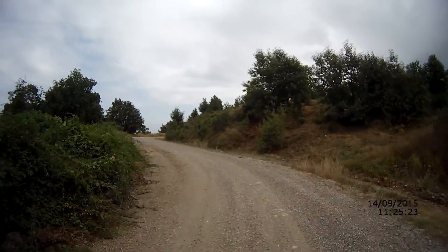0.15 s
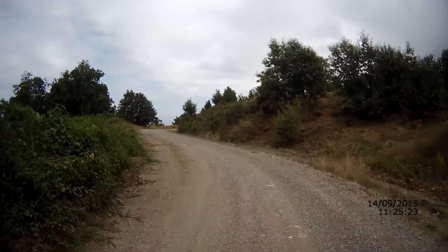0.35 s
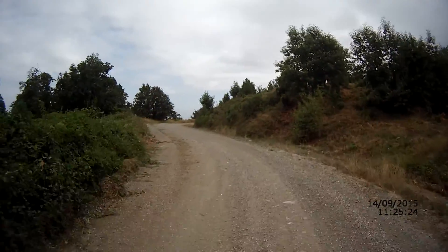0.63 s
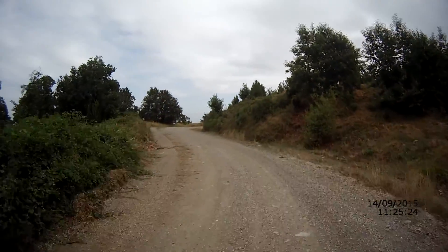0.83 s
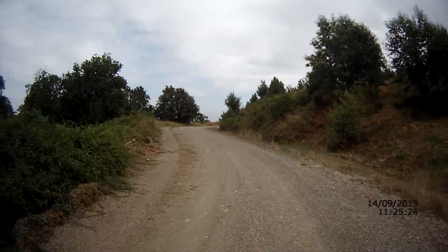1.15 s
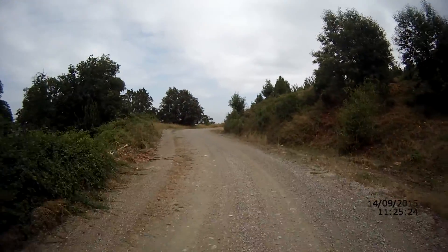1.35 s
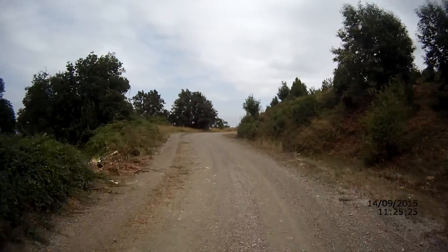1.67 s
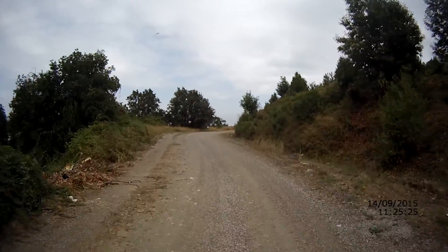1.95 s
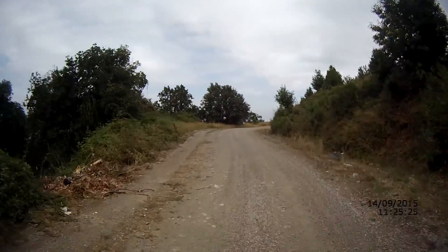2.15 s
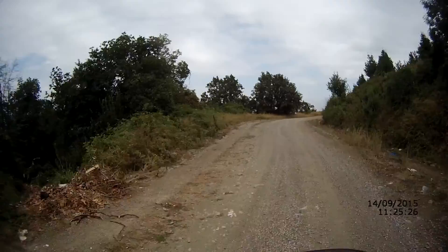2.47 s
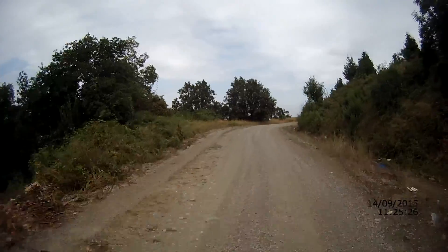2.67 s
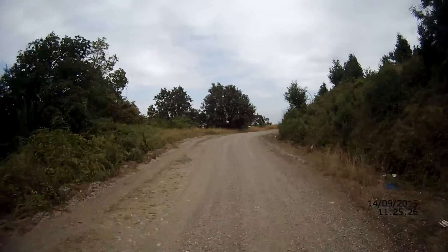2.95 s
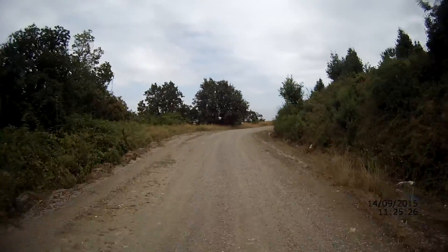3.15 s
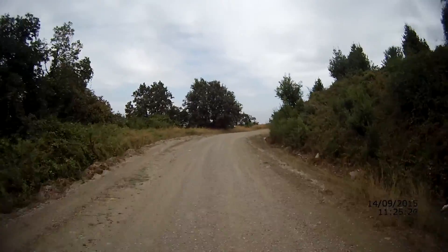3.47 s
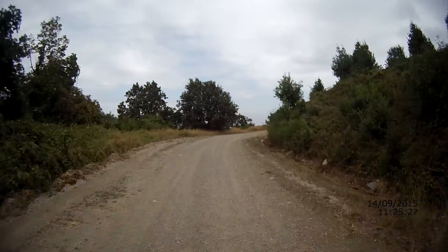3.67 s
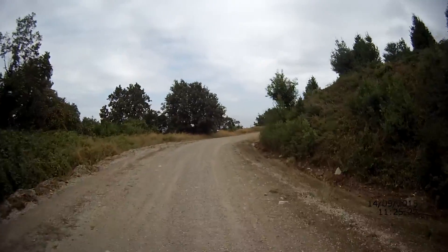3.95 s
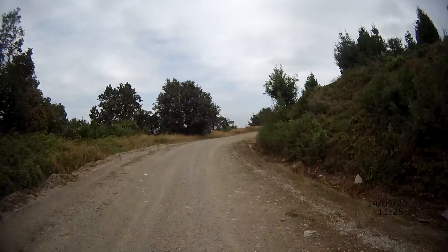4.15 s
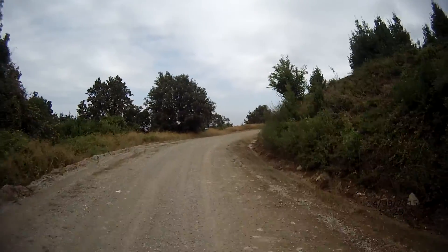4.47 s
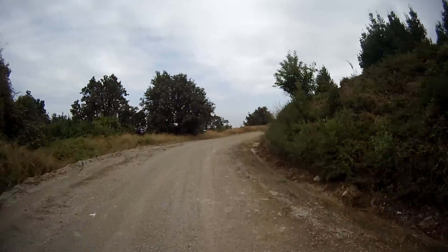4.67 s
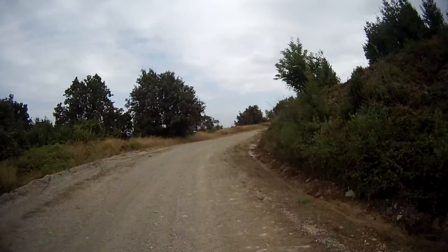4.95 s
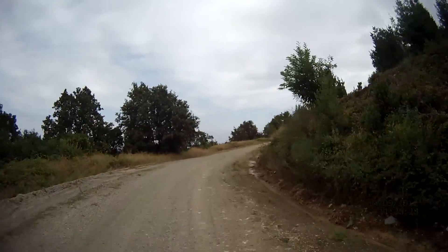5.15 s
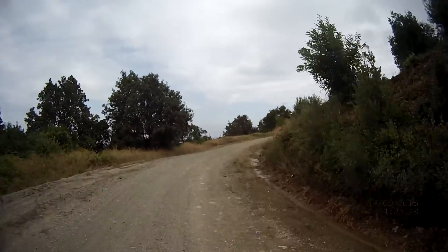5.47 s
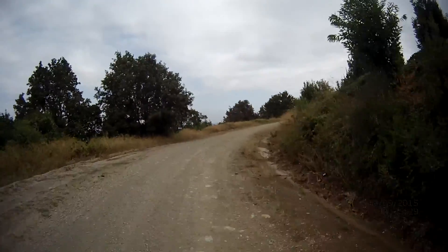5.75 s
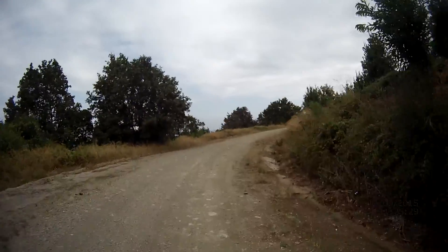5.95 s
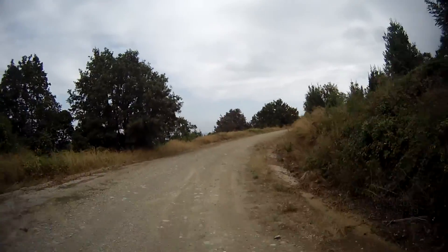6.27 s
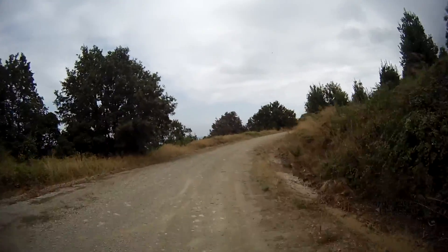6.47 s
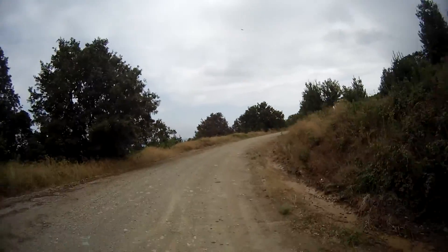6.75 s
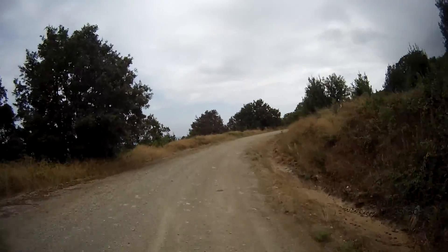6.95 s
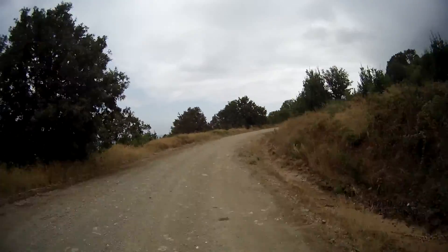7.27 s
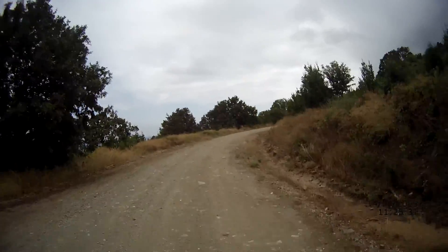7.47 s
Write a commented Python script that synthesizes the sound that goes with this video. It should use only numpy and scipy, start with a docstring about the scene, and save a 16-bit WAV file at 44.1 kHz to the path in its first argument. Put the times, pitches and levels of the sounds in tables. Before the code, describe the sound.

Close, boxy onboard sound of a motorcycle gently accelerating outdoors on rough gravel. Pulsing mechanical clatter smooths into a steady rattling buzz while air hiss and crunchy tyre noise grow. Near the start a small stone skitters sharply against metal, then knocks dully. Afterwards panels sing and a narrow whistle comes and goes over low vibration and soft gusts until the end.

```python
"""A motorcycle's engine clatters and gathers speed gently on a gravel road, heard in a plastic camera case.
Engine clatter, rushing air and tyre grit are noise passed through narrow resonances or a broad spectrum.
Panels sing and one resonance whistles; the low shake is a pair of sines locked to the crank.
The mount booms on the rough road and wind rumbles faintly, both as filtered noise.
Early on, one thrown stone chinks against metal as noise bursts and decaying sines; dull knocks follow."""
import sys
import numpy as np
from scipy import signal
from scipy.fft import rfft, irfft, next_fast_len
from scipy.io import wavfile
from scipy.ndimage import uniform_filter1d, map_coordinates

SR = 44100
rng = np.random.default_rng(int(sys.argv[2]) if len(sys.argv) > 2 else 0)


def unload_audio(sound):
    """Save the sound as a 16-bit wav file, at the path given as the first command line argument."""
    columns = np.transpose(np.atleast_2d(sound))
    # keep every value between -1 and 1, then stretch to whole-number steps
    steps = np.round(np.clip(columns, -1, 1) * 32767)
    wavfile.write(sys.argv[1], SR, steps.astype(np.int16))


N = 335601

# Wind: gusts and lulls (middle [s], reach [s], change in rumble [dB], change in buffeting [dB])
GUSTS = [(.1, .12, -4, -1), (.6, .2, -2, 3), (1.02, 0.075, -10, -10), (1.25, .08, -1, -1),
         (1.56, .08, 0, -15), (1.74, 0.064, -2, 0), (1.9, 0.056, 0, -6), (2.17, .13, 2, -7),
         (3.1, .3, 1, -4), (3.9, .15, -3, 1.5), (4.4, .3, -4, 0), (5.05, .25, -3, -3), (5.6, .3, -5, -2),
         (6.15, 0.12, 4, 4), (6.74, .07, 8, 0), (7.25, .08, 6.5, 6), (7.5, .08, 1, 3)]
# Wind spectra: (frequency [Hz], relative density [dB per Hz])
RUMBLE_COLOUR = [(8, -4), (18, 1), (30, -2), (45, -5), (65, -10), (95, -27), (130, -50), (400, -90)]
BUFFET_COLOUR = [(30, -24), (60, -0.5), (90, -3.5), (110, -2.5), (135, -19), (200, -31), (500, -80)]
RUSH_COLOUR = [(100, -16), (170, -5), (300, 1), (700, -1), (1000, -8), (2000, -16), (3000, -8), (6000, -18),
               (12000, -16)]
# Case resonances blown by the air: (frequency [Hz], approximate width [Hz], relative level [dB])
AIR_MODES = [(1120, 93, -6), (2515, 91, -4), (3764, 200, 1.5), (4070, 165, 2.5), (4200, 150, -1.5),
             (4505, 107, 0), (4680, 150, -1.5), (4930, 120, 0), (5132, 140, 3.5), (5300, 110, -3),
             (5520, 160, -7.5), (6190, 1030, -8.5), (6530, 270, -10), (6820, 200, -9), (8475, 770, -10),
             (9500, 480, -20), (11130, 1000, -25.5)]
# Rough and smooth road: (middle [s], reach [s], change in mount boom [dB], change in frame drone [dB])
STRETCHES = [(.08, 0.17, 5, 2.5), (1.5, 0.19, -6, -1.5), (2.12, 0.1, -29, -1.5), (2.76, 0.064, 5, 1.5),
             (3.38, 0.1, 4, -0.5), (3.6, 0.079, -7, -0.5), (4.25, 0.094, 2, -1.5), (4.6, .06, -2, -1.5),
             (5.1, 0.22, 0.5, 0.5), (5.38, 0.065, 1, 0.5), (5.57, 0.12, 3.5, -0.5), (5.87, .13, 2.5, -0.5),
             (6.17, 0.11, 2, -0.5), (6.5, 0.11, -1.5, -0.5), (6.8, .06, 2, 0), (7, 0.11, -0.5, -2.5),
             (7.26, 0.13, -2, 0), (7.58, 0.067, -7, 1.5)]
# Camera mount resonances: (frequency [Hz], approximate width [Hz], relative level [dB])
MOUNT_MODES = [(151, 26.6, -5.5), (196.8, 13.5, -1), (227, 26, -7), (337, 97, -16.5)]
# Frame resonances rung by the road: (frequency [Hz], approximate width [Hz], relative level [dB])
ROAD_MODES = [(209, 39, 6.5), (290, 59, -6), (360, 42, 0.5), (456, 49, 1.5), (583, 210, -7), (695, 112, -2),
              (893, 126, -9), (1144, 98, -3.5)]
# Broad tyre spectrum: (frequency [Hz], relative density [dB per Hz])
TYRE_COLOUR = [(200, -29), (500, 0.5), (1000, 0.5), (1500, 4.5), (2450, 7.5), (2920, 1), (3400, 2.5),
               (5000, 6), (6000, -13.5), (7500, 0.5), (9300, -12), (10200, -13), (11500, -15.5),
               (13500, -35)]
# Bumps that jolt the bike: (time [s], change in rattle [dB])
JOLTS = [(4.84, -0.5), (5.17, 2), (6.0, 1.5), (7.25, 3)]
JOLT_RISE_S, JOLT_FADE_S = 0.018, 0.072
# Stone contacts: (time [s], crack level [dB], ring level [dB])
STONE = [(1.6832, -44, -48), (1.6848, -28.5, -32.5), (1.6873, -28.5, -35), (1.6914, -33, -31),
         (1.6953, -31, -39), (1.7015, -43, -53), (1.7077, -38, -45), (1.7094, -36, -44), (1.7132, -36, -48),
         (1.718, -44, -52), (1.7225, -44, -52)]
# Modes of the struck metal: (frequency [Hz], relative level [dB], time to decay by 60 dB [s])
STONE_MODES = [(3220, -21, 0.089), (3220, -17, 0.035), (3790, -19, .035), (4000, -15, .03),
               (4520, -20, 0.031), (4650, -14, .025), (4900, -13, 0.045), (5140, 1, 0.022),
               (5150, -5.5, 0.018), (5300, -15, .03), (6400, -16, 0.044), (6850, -19, .03),
               (7770, -17, 0.038), (8450, -12.5, .025), (8880, -16.5, .015), (11580, -26, .025)]
# Spectrum of the crack: (frequency [Hz], relative density [dB per Hz])
CRACK_COLOUR = [(2800, -50), (3200, -6), (3800, -5), (5000, 3), (5700, -12), (6400, -7.5), (8500, -7.5),
                (9800, -21), (11700, -21), (14000, -38)]
# Dull knocks after the stone: (time [s], relative level [dB])
KNOCKS = [(1.7328, -33), (1.7375, -32.5), (1.7472, -33), (1.7535, -41), (1.768, -41)]
# Resonances of the knocks: (frequency [Hz], approximate width [Hz], relative level [dB])
KNOCK_MODES = [(520, 220, -3.5), (756, 170, -6.5), (1300, 520, -7)]
# Mean engine speed: (time [s], crank turns per second [Hz])
CRANK = [(0, 32.8), (.8, 33.9), (1.6, 35.56), (2.3, 38.54), (3, 41.2), (3.6, 42.3), (4, 42.9), (4.5, 45.5),
         (5.1, 46.8), (7.6, 47.2)]
CRUISE_HZ = 47.5  # crank speed at which speed-dependent levels are given
# How hard the engine clatters for its speed: (time [s], level [dB])
EFFORT = [(0, 2), (1.3, -1), (2, -1), (3.1, 1), (4, -0.1), (5.3, 0.5), (6, 0.3), (6.45, -1), (6.7, 0.5),
          (7.6, 0.5)]
# Case resonances rung by the engine: (frequency [Hz], approximate width [Hz], relative level [dB])
ENGINE_MODES = [(1379, 125, -2.5), (1570, 190, -3), (1773, 140, 0.5), (2095, 110, -6.5), (2305, 107, -1.5),
                (2463, 75, 2), (2690, 275, -4.5), (3250, 203, -0.5), (4220, 170, -2.5), (4470, 100, 0),
                (4945, 100, -0.5), (5144, 260, 0)]
# Singing panels: (frequency [Hz], approximate width [Hz], base level at cruise [dB],
# growth with speed [dB per octave], critical crank speed [Hz], reach in crank speed [Hz], gain there [dB])
PANELS = [(1811, 150, -63, 21, 47.6, 1.6, 4), (2365, 160, -68.5, 30, 47.4, 2.2, 2.5)]
# Panels buzz up or settle: (middle [s], reach [s], change in lower panel [dB], change in upper panel [dB])
SURGES = [(3.14, 0.045, 7, 0), (4.94, .04, 6, -1), (5.348, .1, 4.5, 2), (6.02, 0.058, 5, 1),
          (6.5, 0.1, -1.5, 8), (6.88, 0.037, -1, 4), (7.02, .04, -1, -2), (7.336, .05, 4, -5)]
# Whistling case resonance: (time [s], level [dB])
WHISTLE = [(0, -77), (2.5, -71), (2.85, -69), (3.15, -58), (3.4, -58), (3.75, -55), (4, -55), (4.25, -59.5),
           (4.65, -60), (4.85, -54.5), (5.1, -63), (5.9, -58.5), (6.15, -63), (6.9, -59.5), (7.3, -56.5),
           (7.6, -58)]
WHISTLE_HZ, WHISTLE_WIDTH_HZ = 3230, 230
# Division of sound by the case: (frequency [Hz], left minus right [dB])
PORTS = [(60, -9), (150, -1.5), (220, 0), (370, 4.5), (480, 8.5), (680, 10), (1000, 8), (1250, 7.5),
         (2300, 6), (4200, 6), (7700, 5), (13000, 2)]
# Phase advance of the left port: (frequency [Hz], lead [radians])
PORT_LEAD = [(130, 0.66), (200, 0.81), (340, 1), (500, 0.72), (900, 0.15)]
# Converter offsets: (left [full scale], right [full scale])
OFFSET = (.060, -.029)
TOP_HZ = 13500  # upper limit of the camera

TIME = np.arange(N) / SR
SIZE = next_fast_len(N, real=True)
FREQ = np.maximum(np.arange(SIZE // 2 + 1) * SR / SIZE, 1)


def undb(db):
    """Logarithmic level: decibels become an amplitude gain."""
    return 10 ** (np.asarray(db) / 20)


def unit(x):
    """Normalisation: scale to an rms of 1."""
    return x / np.sqrt(np.mean(x ** 2))


def curves(table):
    """Linear interpolation: join each column of a table by straight lines in time."""
    s, *columns = np.transpose(table)
    return [np.interp(TIME, s, column) for column in columns]


def noise():
    """White noise: independent normal samples with a flat expected spectrum."""
    return rng.standard_normal(N)


def walk(rate):
    """Smoothed random steps: a wandering of spread near 1, with about `rate` new values a second."""
    k = int(SR / rate)
    steps = np.repeat(rng.standard_normal(N // k + 1), k)
    return unit(uniform_filter1d(steps, k)[:N])


def shape(x, gain):
    """Linear filtering: multiply the spectrum by a gain at each frequency."""
    return irfft(rfft(x, SIZE) * gain, SIZE)[..., :N]


def waver(x, share, rate=9):
    """Time warping: the flexing case shifts its resonances up and down by a small share."""
    delay = np.cumsum(share * walk(rate))
    return map_coordinates(x, [np.arange(N) + delay], mode="mirror")


def colour(points):
    """Spectral envelope: gain joined through (Hz, dB) points on a logarithmic frequency axis."""
    hz, db = np.transpose(points)
    return undb(np.interp(np.log(FREQ), np.log(hz), db))


def resonances(modes):
    """Superposition of resonances: steep-skirted responses add in power."""
    power = 0
    for hz, width, db in modes:
        detuning = (FREQ - hz * hz / FREQ) / width
        power = power + undb(2 * db) / (1 + detuning ** 2 / 2) ** 2
    return np.sqrt(power)


def bell(x, centre, reach):
    """Gaussian hump: 1 at the centre, 1/e at the reach."""
    return np.exp(-((x - centre) / reach) ** 2)


def humps(table):
    """Sum of Gaussian rises and dips in level, one curve for each dB column."""
    return sum(np.outer(db, bell(TIME, s, reach_s)) for s, reach_s, *db in table)


def with_speed(db_per_octave):
    """Power law of speed: level in dB against cruising, by a fixed amount per doubling."""
    return db_per_octave * np.log2(curves(CRANK)[0] / CRUISE_HZ)


def jolt():
    """Transient excitation: each bump changes the rattle in dB quickly, then lets it fade back slowly."""
    change_db = 0
    for s, db in JOLTS:
        distance = np.maximum((s - TIME) / JOLT_RISE_S, (TIME - s) / JOLT_FADE_S)
        change_db = change_db + db * np.exp(-distance)
    return change_db


def bursts(hits, decay_s):
    """Impulsive contact: noise starts at once and dies exponentially for each (s, dB, ..) hit."""
    envelope = 0
    for s, db, *_ in hits:
        fade = np.exp(-np.abs(TIME - s) / decay_s)
        envelope = envelope + undb(db) * (TIME >= s) * fade
    return noise() * envelope


def eddies(points, eddy_db=1.7):
    """Turbulence: independent, level-wandering noise of one spectrum at each of the two ports."""
    ports = []
    for _ in range(2):
        turbulence = noise() * undb(eddy_db * walk(17))
        ports.append(unit(shape(turbulence, colour(points))))
    return np.array(ports)


def wind(rumble_db=-57.5, buffet_db=-64.5, rush_db=-66, rush_db_per_octave=13):
    """Flow noise: gusts and lulls alter rumble and buffeting at both ports; the rush grows with speed."""
    rumble_change_db, buffet_change_db = humps(GUSTS)
    rumble = eddies(RUMBLE_COLOUR) * undb(rumble_db + rumble_change_db)
    buffet = eddies(BUFFET_COLOUR) * undb(buffet_db + buffet_change_db)
    rush = eddies(RUSH_COLOUR) * undb(rush_db + with_speed(rush_db_per_octave))
    return rumble + buffet + rush


def air(hiss_db=-51.5, db_per_octave=7.0, flutter_db=.5):
    """Flow-excited resonance: air over the case hisses in its modes, louder with speed."""
    hiss = unit(shape(noise(), resonances(AIR_MODES)))
    return hiss * undb(hiss_db + with_speed(db_per_octave) + flutter_db * walk(22.24))


def road(drone_db=-57.5, drone_db_per_octave=14, boom_db=-57, boom_db_per_octave=18,
         bumps_db=1.0, judder_db=2.0):
    """Forced vibration: the rough surface drives frame drone and mount boom, both more with speed."""
    boom_change_db, drone_change_db = humps(STRETCHES)
    drone = unit(shape(noise(), resonances(ROAD_MODES)))
    drone_level_db = drone_db + with_speed(drone_db_per_octave) + drone_change_db + bumps_db * walk(18)
    boom = unit(shape(noise(), resonances(MOUNT_MODES)))
    boom_level_db = boom_db + with_speed(boom_db_per_octave) + boom_change_db + judder_db * walk(20)
    return drone * undb(drone_level_db) + boom * undb(boom_level_db)


def tyres(grit_db=-58.0, db_per_octave=15, grains_per_s=4500, spread_db=3.0, patchy_db=2.5):
    """Random impulses: dense grit crackles under the tyres in patches, louder with speed."""
    present = rng.random(N) < grains_per_s / SR
    size_db = spread_db * np.minimum(rng.exponential(size=N), 5)
    grains = present * noise() * undb(size_db)
    level_db = grit_db + with_speed(db_per_octave) + jolt() + patchy_db * walk(16)
    return unit(shape(grains, colour(TYRE_COLOUR))) * undb(level_db)


def stone(contact_s=0.00052, crack_s=0.0023, rattle_s=0.009, rattle_db=-16, knock_s=0.0035):
    """Modal impact: each contact of the skittering stone cracks, rattles and rings the same metal modes."""
    ring, t = np.zeros(N), TIME[:SR // 4]
    attack = 1 - np.exp(-(t / contact_s) ** 2)
    for s, _, ring_db in STONE:
        start = int(s * SR)
        for hz, mode_db, t60 in STONE_MODES:
            decay = np.exp(-np.log(1000) * t / t60)
            mode = attack * decay * np.sin(2 * np.pi * hz * t)
            ring[start:start + len(t)] += undb(ring_db + mode_db) * mode
    contacts = bursts(STONE, crack_s) + undb(rattle_db) * bursts(STONE, rattle_s)
    crack = shape(contacts, colour(CRACK_COLOUR))
    knocks = shape(bursts(KNOCKS, knock_s), resonances(KNOCK_MODES))
    return ring + crack + knocks


def panels(drive, crank_hz, drift, swell_db=1.35):
    """Sympathetic resonance: panels sing more as the crank nears their critical speeds."""
    total = 0
    for panel, surge_db in zip(PANELS, humps(SURGES)):
        hz, width, db, growth_db, critical_hz, reach_hz, gain_db = panel
        level_db = db + with_speed(growth_db) + gain_db * bell(crank_hz, critical_hz, reach_hz)
        level_db = level_db + surge_db + swell_db * walk(20)
        sing = shape(noise() * drive, resonances([(hz, width, 0)]))
        total = total + unit(waver(sing, drift)) * undb(level_db)
    return total


def whistle(drive):
    """Narrow-band resonance: one case mode whistles far more at some moments."""
    tone = shape(noise() * drive, resonances([(WHISTLE_HZ, WHISTLE_WIDTH_HZ, 0)]))
    return unit(tone) * undb(curves(WHISTLE)[0])


def engine_shake(turns, crank_hz, shake_db=-67.0, db_per_octave=2, frame_hz=43.2, frame_reach_hz=3.8,
                 frame_db=7.0, second_db=-14):
    """Forced oscillation: two crank harmonics swell as the crank passes the frame's resonance."""
    harmonics = np.sin(2 * np.pi * turns) + undb(second_db) * np.sin(4 * np.pi * turns)
    swell_db = with_speed(db_per_octave) + frame_db * bell(crank_hz, frame_hz, frame_reach_hz)
    return unit(harmonics) * undb(shake_db + swell_db)


def engine(depth=0.56, sharpness=0.86, blur_hz=39.2, clatter_db=-51.5, db_per_octave=13, drift=.007):
    """Periodic excitation: one cylinder swells the clatter each turn; returns clatter and low shake."""
    crank_hz = curves(CRANK)[0]
    turns = np.cumsum(crank_hz * (1 + 0.0051 * walk(11))) / SR
    strength = undb(noise()[turns.astype(int)])  # no two turns are quite alike
    knock = unit(np.exp(-sharpness * np.cos(2 * np.pi * turns)) * strength)
    # the separate knocks run together as the engine speeds up
    share = depth / (1 + (crank_hz / blur_hz) ** 8)
    drive = np.sqrt(1 - share + share * knock ** 2)
    clatter = unit(waver(shape(noise() * drive, resonances(ENGINE_MODES)), drift))
    clatter = clatter * undb(clatter_db + with_speed(db_per_octave))
    clatter = clatter + panels(drive, crank_hz, drift)
    clatter = clatter * undb(curves(EFFORT)[0] + jolt())
    return clatter + whistle(drive), engine_shake(turns, crank_hz)


def scene():
    """Level and phase difference: case sound is split between two ports; low shake reaches both alike."""
    clatter, shake = engine()
    case = clatter + air() + tyres() + road() + stone()
    hz, lead = np.transpose(PORT_LEAD)
    phase = np.interp(np.log(FREQ), np.log(hz), lead)
    ratio = colour(PORTS) * np.exp(1j * phase)  # left over right
    # the mean of the two ports stays equal to the case sound
    port_gains = 2 * np.array([ratio, np.ones_like(ratio)]) / (1 + ratio)
    return shape(case, port_gains) + shake + wind()


def record(dry, hiss_db=-82):
    """Band limiting: the camera adds faint hiss, cuts the top, and its converter sits off zero."""
    hiss = undb(hiss_db) * rng.standard_normal(dry.shape)
    # order 10, 0.2 dB passband ripple, 80 dB stopband loss
    low_pass = signal.ellip(10, .2, 80, TOP_HZ, fs=SR, output="sos")
    return signal.sosfilt(low_pass, dry + hiss) + np.array(OFFSET)[:, None]


dry = scene()
out = record(dry)
unload_audio(out)
```